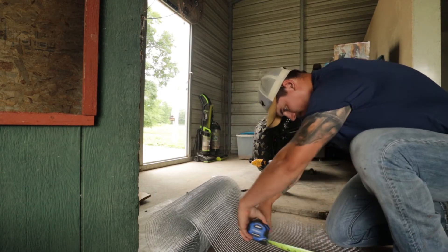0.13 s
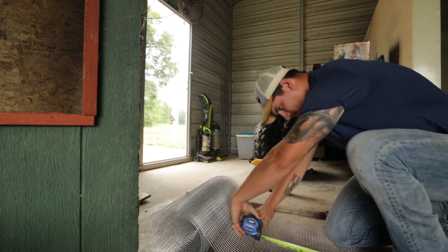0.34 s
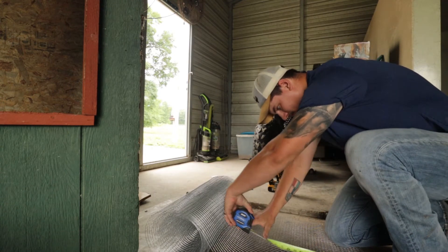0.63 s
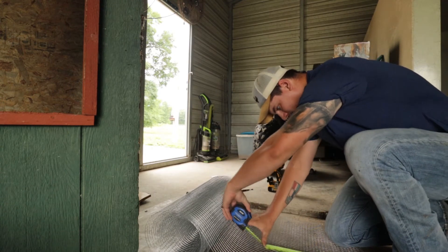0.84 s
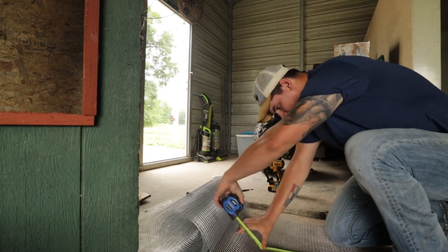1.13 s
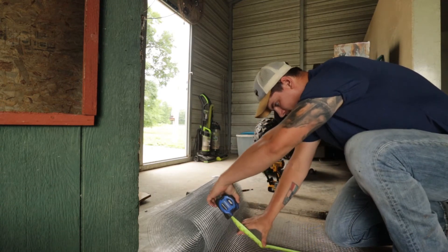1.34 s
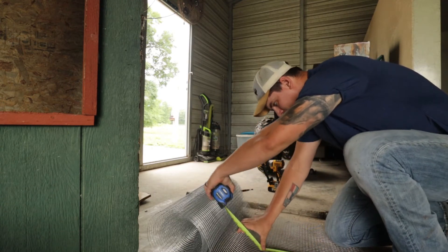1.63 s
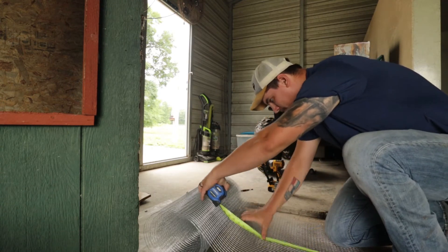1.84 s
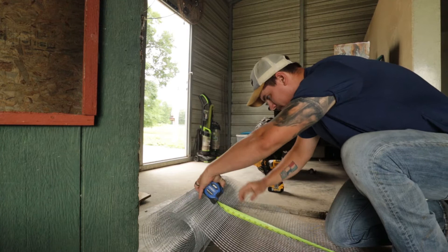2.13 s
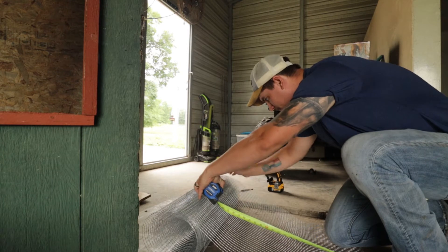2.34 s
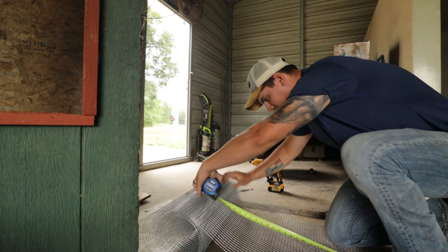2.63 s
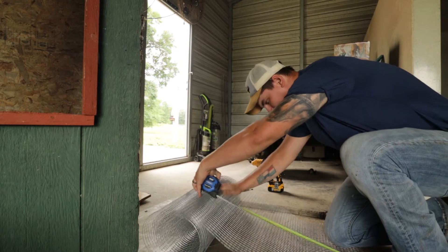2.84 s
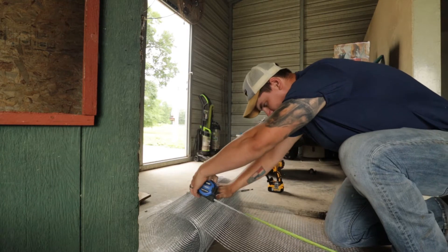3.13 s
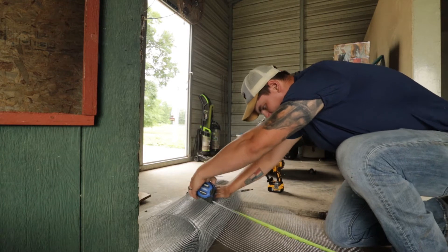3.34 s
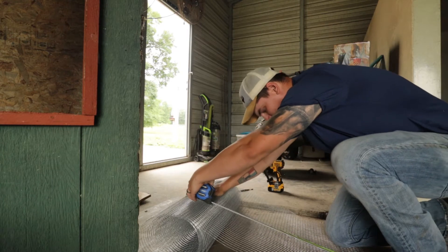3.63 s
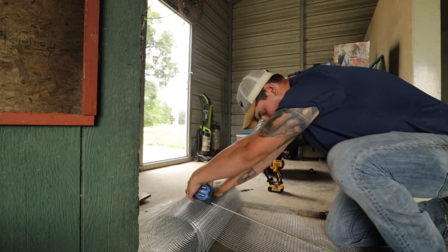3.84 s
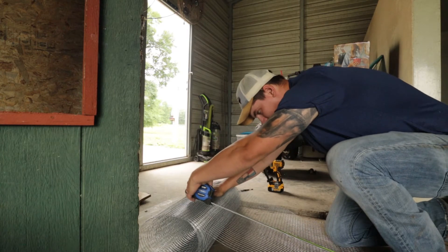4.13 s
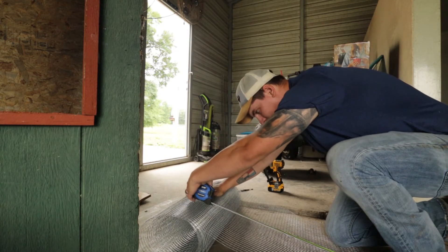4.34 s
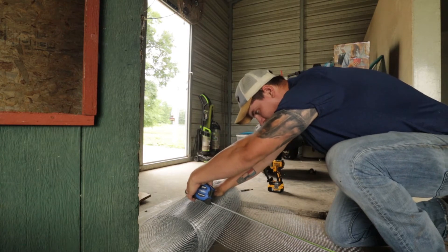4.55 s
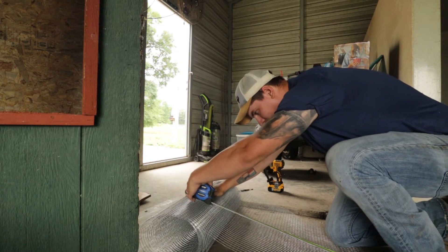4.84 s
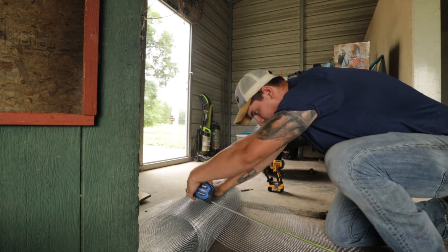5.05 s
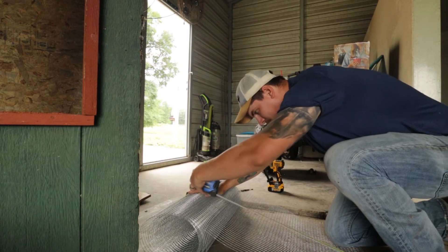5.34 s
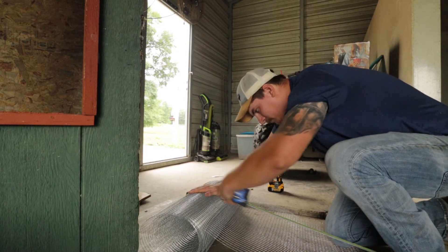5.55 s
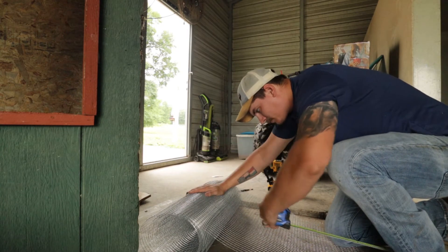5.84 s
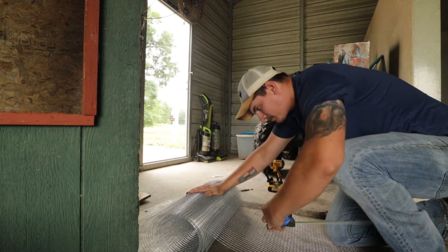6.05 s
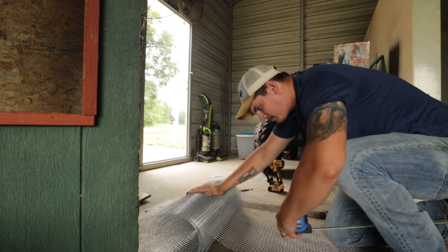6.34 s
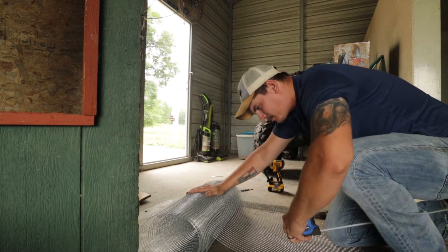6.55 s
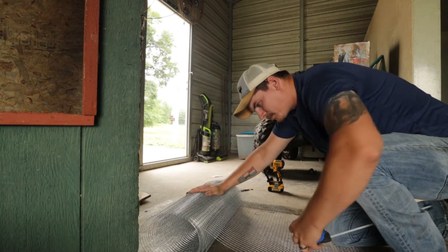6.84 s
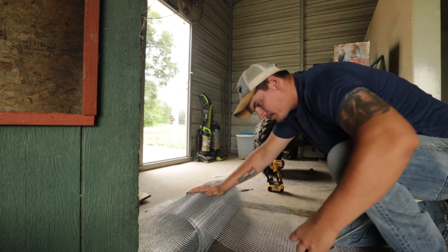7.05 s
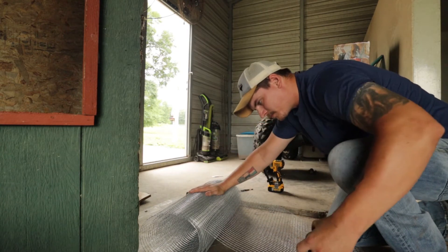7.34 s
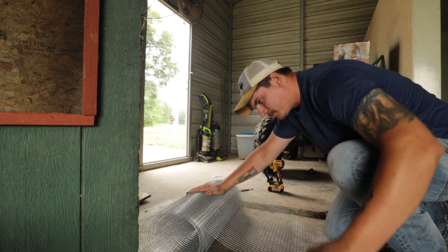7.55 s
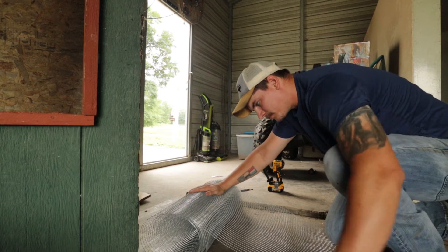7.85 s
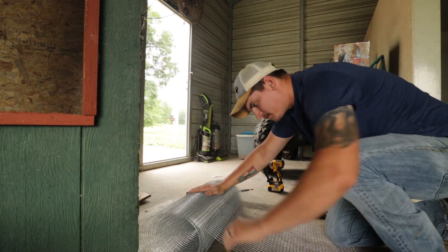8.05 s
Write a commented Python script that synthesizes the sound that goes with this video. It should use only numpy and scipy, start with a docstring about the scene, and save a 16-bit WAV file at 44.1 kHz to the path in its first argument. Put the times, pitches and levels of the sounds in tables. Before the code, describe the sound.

A steel tape slides and snaps over wire mesh in an echoing metal shed, with a low cooling hum, bird chirps and throbbing insects.

```python
"""Tape measure on wire mesh

A steel tape measure is drawn over a roll of welded wire mesh on the concrete floor of a sheet-metal shed.
Snaps are short noise rattles, sliding is many tiny ticks, and the set-down tape case knocks and rings.
A cooling unit hums in steady tones over noisy air; birds (gliding sines) and insects (throbbing noise)
come in through the open door. Handling and bird sounds also echo in the shed."""
import sys
import numpy as np
from scipy import signal
from scipy.fft import rfft, irfft, next_fast_len
from scipy.io import wavfile

SR = 44100
rng = np.random.default_rng(int(sys.argv[2]) if len(sys.argv) > 2 else 0)


def generate_wav(sig):
    """Save sig (samples, or channels by samples) to the path in sys.argv[1] as 16-bit PCM at SR."""
    pcm = np.round(np.clip(np.atleast_2d(sig).T, -1, 1) * 32767).astype(np.int16)
    wavfile.write(sys.argv[1], SR, pcm)


N = 361619
TIME = np.arange(N) / SR
HIT_SAMPLES = 4096   # longest rattle, about 93 ms

# Ringing tones of the steel blade: pitch_hz [Hz], level_db [dB], t60_s [s to fall 60 dB]
BLADE_RING = [(3934, 5, .2), (5230, 8, .3), (5250, -22, 0.28), (6480, -8, 0.23), (6150, -11, 0.21),
              (7700, -26, 0.18), (7770, -7.5, 0.132), (7980, -10.5, 0.19)]


def amp(db):
    """Turn decibels into a gain."""
    return 10 ** (np.asarray(db) / 20)


def rms_one(x):
    """Scale to an rms (average strength) of 1."""
    return x / np.sqrt(np.mean(x ** 2) + 1e-20)


def at_hz(points, hz):
    """Read a table between its points, with frequency spaced in octaves."""
    table_hz, values = np.transpose(points)
    return np.interp(np.log(hz), np.log(table_hz), values)


def colour(x, spectrum):
    """Filter x by a table of dB at each frequency, then scale to rms 1."""
    size = next_fast_len(len(x))
    hz = np.maximum(np.fft.rfftfreq(size, 1 / SR), 1)
    filtered = irfft(rfft(x, size) * amp(at_hz(spectrum, hz)), size)
    return rms_one(filtered[:len(x)])


def band(x, low_hz, high_hz):
    """Keep the sound between two frequencies."""
    sos = signal.butter(2, [low_hz, min(high_hz, 20000)], "band", fs=SR, output="sos")
    return signal.sosfilt(sos, x)


def resonance(x, hz, width_hz):
    """Favour one pitch, like a damped vibrating body; the gain is 1 at the top."""
    r = np.exp(-np.pi * width_hz / SR)
    top = np.array([1, 0, -1]) * (1 - r * r) / 2
    return signal.lfilter(top, [1, -2 * r * np.cos(2 * np.pi * hz / SR), r * r], x)


def ring(x, modes):
    """Let x strike several fading tones at once; a click of size 1 starts each at its level."""
    out = 0
    for hz, level_db, t60_s in modes:
        r = amp(-60 / (t60_s * SR))
        w = 2 * np.pi * hz / SR
        # the tiny offset keeps the filter out of very slow number ranges
        tone = signal.lfilter([0, np.sin(w)], [1, -2 * r * np.cos(w), r * r], x + 1e-18)
        out = out + amp(level_db) * tone
    return out


def drift(rate_hz):
    """Random wandering of spread 1; a higher rate wanders faster."""
    r = np.exp(-2 * np.pi * rate_hz / SR)
    noise = rng.standard_normal(N + SR)
    return rms_one(signal.lfilter([1], [1, -2 * r, r * r], noise)[SR:])   # skip the filter's start


def rattles(events, t60s):
    """Per event: a dying rattle of contacts, and one click of equal energy to set off the echo."""
    after = np.arange(HIT_SAMPLES) / SR
    noises = rng.standard_normal((len(events), HIT_SAMPLES))
    for (start_s, level_db, *_), t60_s, noise in zip(events, t60s, noises):
        attack = 1 - np.exp(-after / 0.00043)
        rattle = noise * amp(level_db - 60 * after / t60_s) * attack
        click = (after == 0) * np.sqrt(np.sum(rattle ** 2))
        first = round(start_s * SR)
        yield slice(first, first + HIT_SAMPLES), np.array([rattle, click])


def cooling_unit():
    """Blade, shaft and mains tones over rushing air, with faint whines of the casing."""
    # Tones at multiples of each base pitch: multiple [whole number], level_db [dB rms]
    fan_tones = {1: -60, 2: -62, 3: -72, 6: -70.5}
    shaft_tones = {2: -64.5, 4: -75, 5: -68, 6: -72.5, 7: -67.5, 9: -71.5, 10: -75, 22: -72.5, 34: -78.5}
    mains_tones = {2: -66.5, 4: -76.5}
    # Colour of the rushing air: pitch_hz [Hz], level_db [relative dB per Hz]
    air_colour = [(30, -22), (55, 3), (90, 2), (180, -1.5), (400, 0), (1000, -3.5), (2500, -11.5),
                  (4300, -14.5), (7200, -29), (10500, -35), (13000, -22.5), (16000, -22)]
    fan_hz, shaft_hz, mains_hz = 73.62, 59.085, 60.01
    in_step_s = 3.49   # all tones peak together here; shaft and mains hum then beat
    turn = 2 * np.pi * (TIME - in_step_s)
    tones = 0
    for hz, multiples in ((fan_hz, fan_tones), (shaft_hz, shaft_tones), (mains_hz, mains_tones)):
        for multiple, level_db in multiples.items():
            tones = tones + np.sqrt(2) * amp(level_db) * np.cos(multiple * hz * turn)
    air_noise, casing_noise = rng.standard_normal((2, N))
    whines = 0
    for hz, width_hz, level_db in ((4200, 370, -121.5), (4900, 40, -80), (6100, 478, -74.5)):
        whines = whines + amp(level_db) * rms_one(resonance(casing_noise, hz, width_hz))
    return tones + amp(-59.5) * colour(air_noise, air_colour) + whines


def insects():
    """A near singer, narrow noise at 9 kHz, swells about four times a second over a wider far chorus."""
    # Pace of the near singer: throb_number [count], time_s [s]
    throb_pace = [(0, .05), (3, .7), (5, 1.25), (11, 2.7), (17, 4.07), (21, 5.07), (34, 8.2)]
    level_db, spread_db, rise_s, fall_s = -61.5, 1, .03, .055
    number, time_s = np.transpose(throb_pace)
    throbs_s = np.interp(np.arange(number[-1] + 1), number, time_s)
    levels_db = level_db + spread_db * rng.standard_normal(len(throbs_s))
    swell = 0
    for throb_s, throb_db in zip(throbs_s, levels_db):
        width_s = np.where(TIME < throb_s, rise_s, fall_s)
        swell = swell + amp(throb_db) * np.exp(-((TIME - throb_s) / width_s) ** 2)
    near, chorus = rng.standard_normal((2, N))
    for _ in range(2):
        near = resonance(near, 9000, 450)
    for _ in range(3):
        chorus = resonance(chorus, 9000, 1600)
    # the near singer never falls quite silent, and its level flickers
    near = (swell + amp(-75)) * rms_one(near) * amp(2 * drift(87))
    return near + amp(-65) * rms_one(chorus)


def sliding():
    """Uneven clumps of ticks over the wires, each a few ms of noise; strokes swell, hold and fade."""
    # Colour of the ticks: pitch_hz [Hz], level_db [relative dB per Hz]
    slide_colour = [(410, -16), (700, 0.5), (830, 0), (1010, -10), (1230, -5.5), (4430, -1), (8760, -10.5),
                    (10800, -21.5), (14000, -19.5), (16000, -28)]
    # Strokes of mesh and blade: start_s [s], length_s [s], level_db [relative dB], brightness_db [dB]
    slide_strokes = [(-.05, .1, -49.5, 5), (.08, 0.242, -50, 4.5), (0.608, 0.37, -58, 5),
                     (0.975, .32, -57.5, 4), (5.404, 0.055, -50.5, 2), (5.562, 0.16, -47, 0),
                     (5.897, 0.11, -49, -6), (6.256, 0.15, -43.5, 4), (6.427, 0.13, -55, 0),
                     (6.677, 0.289, -54, 12), (6.999, 0.428, -54.5, 11), (7.438, 0.044, -48.5, 5)]
    attack_s, release_s, ticks_per_s = 0.059, 0.027, 7300   # tick rate drifts around this
    born = rng.random(N) < ticks_per_s * amp(2.5 * drift(40)) / SR
    sizes = born * amp(3.8 * np.minimum(rng.exponential(1, N), 5))
    fade = amp(-60 / (0.016 * SR))   # each tick falls 60 dB in 16 ms
    ticks = signal.lfilter([1], [1, -fade], sizes) * rng.standard_normal(N)
    ticks = colour(ticks, slide_colour)
    ticks = ticks + amp(-63) * ring(ticks, BLADE_RING)   # the blade sings faintly as it is dragged
    # the scrape shifts its colour from wire to wire
    for low_hz, high_hz in ((1500, 5000), (3500, 6500), (6000, 9700)):
        ticks = ticks + (amp(3.1 * drift(6.3)) - 1) * band(ticks, low_hz, high_hz)
    treble = signal.sosfilt(signal.butter(2, 6000, "high", fs=SR, output="sos"), ticks)
    out = 0
    for start_s, length_s, level_db, bright_db in slide_strokes:
        end_s = start_s + length_s
        corners_s = [start_s - attack_s, start_s, end_s, end_s + release_s]
        stroke = np.interp(TIME, corners_s, [0, 1, 1, 0]) ** 2
        out = out + amp(level_db) * stroke * (ticks + (amp(bright_db) - 1) * treble)
    return out


def blows():
    """Blade on mesh: a noisy crack with a brief pitch, body below, sheen above and a faint blade ring."""
    # Snaps and ticks: start_s [s], level_db [relative dB], centre_hz [Hz], t60_s [s to fall 60 dB]
    snaps = [(0.0767, -39, 6000, .025), (0.1222, -31, 5460, 0.023), (0.2764, -30, 2520, 0.052),
             (0.326, -37, 5960, .02), (0.81, -37, 5070, .022), (0.835, -34.5, 7800, .014),
             (0.9159, -40, 3730, .056), (0.976, -38.5, 8550, 0.027), (1.503, -42, 9000, .034),
             (1.5464, -24, 7400, 0.025), (1.5596, -15.5, 2500, .025), (1.704, -28.5, 2730, .048),
             (1.7148, -33, 2675, .03), (1.9932, 2.5, 6140, 0.078), (2.6835, -35, 2970, 0.065),
             (2.78, -46, 2910, 0.07), (2.9896, -42, 8880, 0.022), (3.1607, -38, 3490, 0.031),
             (3.1923, -39, 3584, .03), (3.726, -47.5, 3150, 0.023), (5.3835, -32, 5700, 0.05),
             (5.409, -34, 5260, 0.036), (5.4359, -35, 4460, 0.095), (5.543, -22, 7700, 0.057),
             (5.607, -34.5, 4430, 0.24), (5.631, -30.5, 6700, 0.19), (5.682, -32.5, 4500, 0.12),
             (5.8842, -32, 6100, 0.021), (5.901, -34.5, 5940, .032), (5.9353, -25.5, 4470, .019),
             (5.9748, -32, 4480, 0.024), (6.009, -36, 3000, 0.023), (6.2386, -20.5, 4140, 0.053),
             (6.2548, -15.5, 5260, 0.14), (6.2754, -12, 4300, 0.012), (6.32, -22.5, 5260, 0.029),
             (6.351, -26, 5250, .026), (6.39, -29.5, 5230, 0.03), (6.428, -27.5, 5460, 0.02),
             (6.5792, -36, 3290, 0.037), (6.766, -29, 4300, 0.015), (6.881, -33, 4370, 0.014),
             (7.0466, -32, 4500, .035), (7.089, -31, 3060, .027), (7.171, -34, 3130, 0.056),
             (7.2543, -32.5, 4900, .035), (7.317, -34, 4470, .04), (7.364, -30.5, 4740, .03),
             (7.4496, -24, 4900, 0.02), (7.4962, -19, 2990, 0.042), (7.4993, -16, 7700, 0.021),
             (7.8594, -11.5, 4630, 0.022), (8.0015, -1, 2400, .01), (8.006, 0.5, 2340, 0.031),
             (8.0214, -6.5, 2870, .02), (8.0771, -18.5, 3660, 0.04)]
    # Echo compared with the blow, less when the hands work near the microphone: time_s [s], level_db [dB]
    echo_levels = [(0, -3), (1.4, 1.5), (1.8, -4), (2, 1), (5.4, 3.5), (5.9, -1.1), (6.5, -4), (6.8, 9.5),
                   (7.4, 2.5), (7.45, -6), (7.85, 1), (8, -5.5), (8.2, 1)]
    crack, body, sheen = np.zeros((3, 2, N + HIT_SAMPLES))   # two rows each: direct, echo source
    for (at, hit), (start_s, level_db, hz, _) in zip(rattles(snaps, np.array(snaps)[:, 3]), snaps):
        echo_db = np.interp(start_s, *np.transpose(echo_levels))
        hit = hit * amp([[0], [echo_db]])
        pitch_db = -4.5 - .2 * (level_db + 31)   # lighter blows have a clearer pitch
        crack[:, at] += resonance(hit, hz, hz)
        crack[:, at] += amp(pitch_db) * resonance(hit, hz, 0.066 * hz)
        body[:, at] += hit * amp(-15)
        sheen[:, at] += hit * amp(-21)
    crack = band(crack, 1216, 9500)
    body = band(body, 1150, 2400)
    sheen = band(sheen, 9500, 17000)
    return (crack + amp(-58.5) * ring(crack, BLADE_RING) + body - sheen)[:, :N]


def knocks():
    """Tape case, hand and roll: one push rings a hollow tone with a dull scuff; the case rings on a little."""
    # Knocks: start_s [s], level_db [relative dB], hollow_hz [Hz], t60_s [s to fall 60 dB],
    # case_ring_db [relative dB]
    thuds = [(0.276, -46.5, 640, 0.035, -9), (0.83, -36, 560, 0.039, -33), (1.504, -44.5, 597, 0.069, -22),
             (1.534, -40.5, 536, 0.11, -32), (1.562, -38.5, 560, 0.054, -12),
             (1.597, -45.5, 576, 0.067, -21), (1.993, -32, 910, 0.084, -25), (2.773, -46, 782, .057, -19.5),
             (5.542, -43, 453, .036, -14), (6.053, -44.5, 910, 0.046, -25), (6.072, -42.5, 507, .05, -32),
             (6.089, -46.5, 696, 0.067, -26), (6.238, -42, 527, 0.06, -30), (6.279, -42, 557, 0.047, -29.5),
             (7.497, -36, 663, 0.069, -12), (7.511, -34, 637, 0.03, -30), (7.537, -44, 682, 0.084, -26.5),
             (7.862, -28.5, 500, .037, -40), (7.872, -28, 586, 0.053, -40), (8.007, -10, 587, 0.023, -5),
             (8.022, -21, 483, 0.024, -28), (8.076, -16, 850, 0.011, -23), (8.094, -41, 754, .04, -4)]
    # Ringing tones of the tape case: pitch_hz [Hz], level_db [dB], t60_s [s to fall 60 dB]
    case_ring = [(1637, 3.5, .012), (1912, 8, 0.11), (1825, -12, 0.11), (1920, -2, 0.05),
                 (2420, -0.5, 0.013)]
    hollow, scuff, case = np.zeros((3, 2, N + HIT_SAMPLES))   # two rows each: direct, echo source
    push = np.arange(HIT_SAMPLES) == 0
    for (at, hit), (_, level_db, hz, t60_s, ring_db) in zip(rattles(thuds, np.array(thuds)[:, 3]), thuds):
        hollow[:, at] += ring(push, [(hz, level_db, t60_s)])
        scuff[:, at] += hit
        case[:, at] += hit * amp(ring_db)
    hollow = band(hollow, 330, 1900)
    scuff = amp(7.5) * band(scuff, 290, 1400)
    case = amp(-23.5) * ring(band(case, 1400, 2550), case_ring)
    return (hollow + scuff + case)[:, :N]


def birds():
    """Sine glides and held notes, broken up by moving air, and what of them reaches the walls."""
    # Quick chirps: start_s [s], length_s [s], from_hz [Hz], to_hz [Hz], level_db [relative dB]
    quick_chirps = [(0.364, 0.066, 2790, 1830, -53), (0.449, 0.07, 3090, 1584, -54.5),
                    (0.921, 0.093, 2850, 2074, -57), (1.004, .095, 3397, 1780, -53),
                    (1.613, 0.031, 2740, 2050, -60), (1.67, .032, 2053, 1556, -51),
                    (1.703, .03, 3000, 1950, -45), (2.197, .044, 2600, 1980, -67),
                    (2.278, 0.072, 2950, 1670, -53.5), (2.684, 0.085, 3100, 1882, -48.5),
                    (2.784, .068, 3200, 1910, -48.5), (3.874, 0.021, 3380, 1960, -53.5),
                    (4.517, .021, 3400, 2043, -54.5), (4.552, 0.037, 3790, 3080, -64.5),
                    (4.612, 0.047, 3350, 2960, -69), (4.774, 0.012, 5820, 7700, -59),
                    (4.784, 0.042, 7750, 7160, -69.5), (5.142, 0.0578, 3100, 2775, -73)]
    # A far bird's notes, each sliding to its pitch: start_s [s], length_s [s], from_hz [Hz],
    # held_hz [Hz], level_db [relative dB]
    held_notes = [(3.855, .025, 3380, 3290, -61), (3.898, .112, 1883, 2190, -59),
                  (4.029, 0.11, 2150, 2167, -57.5), (4.144, .07, 2164, 2160, -68),
                  (4.065, 0.17, 3480, 3550, -73), (4.472, 0.047, 2900, 2930, -64),
                  (4.543, 0.085, 1550, 2117, -55.5), (4.646, 0.123, 2174, 2160, -53.5),
                  (4.792, 0.084, 2120, 2117, -68), (5.055, 0.07, 3315, 3294, -61.5),
                  (5.138, .14, 3300, 3260, -72), (5.203, .08, 2830, 2750, -71)]
    scoop_s, attack_s, release_s = .018, .004, 0.012
    chirps, echoed, whistles = 0, 0, 0
    for start_s, length_s, from_hz, to_hz, level_db in quick_chirps:
        part = np.clip((TIME - start_s) / length_s, 0, 1)
        pitch_hz = from_hz * (to_hz / from_hz) ** part
        chirp = amp(level_db) * np.sin(2 * np.pi * np.cumsum(pitch_hz) / SR)
        chirps = chirps + chirp * np.sin(np.pi * part) ** .8
        echo_db = -2.5 - .45 * (level_db + 50.5)   # fainter chirps have more echo for their level
        echoed = echoed + amp(echo_db) * chirp * np.sin(np.pi * part) ** 0.15
    for start_s, length_s, from_hz, held_hz, level_db in held_notes:
        since_s, left_s = TIME - start_s, start_s + length_s - TIME
        pitch_hz = held_hz + (from_hz - held_hz) * np.exp(-np.maximum(since_s, 0) / scoop_s)
        shape = np.clip(np.minimum(since_s / attack_s, left_s / release_s), 0, 1)
        whistles = whistles + amp(level_db) * shape * np.sin(2 * np.pi * np.cumsum(pitch_hz) / SR)
    flutter = amp(4 * drift(40))
    whistles = flutter * whistles
    return np.sqrt(flutter) * chirps + whistles, echoed + amp(-9.5) * whistles


def pings():
    """Two light ticks ping briefly at one pitch, each a sine that dies away."""
    # Light ticks: start_s [s], level_db [dB]
    ping_ticks = [(3.1607, -47), (3.1923, -44)]
    ping_hz, t60_s = 3600, 0.033
    start_s, level_db = np.transpose(ping_ticks)
    clicks = np.zeros(N)
    clicks[(start_s * SR).astype(int)] = amp(level_db)
    return ring(clicks, [(ping_hz, 0, t60_s)])


def shed(x):
    """Dense echoes off sheet walls and concrete: noise that swells in quickly and dies band by band."""
    # How long the echo lasts: pitch_hz [Hz], t60_s [s to fall 60 dB]
    echo_times = [(200, 0.32), (1000, 0.57), (2500, 0.8), (5000, 0.68), (8000, 0.67), (11000, 0.48),
                  (16000, 0.36)]
    swell_s = 0.0016
    after = np.arange(SR) / SR
    edges_hz = 150 * 2 ** np.arange(0, 7.1, .5)   # half-octave bands
    echo = 0
    for low_hz, high_hz in zip(edges_hz, edges_hz[1:]):
        t60_s = at_hz(echo_times, np.sqrt(low_hz * high_hz))
        echo = echo + band(rng.standard_normal(SR), low_hz, high_hz) * amp(-60 * after / t60_s)
    echo = echo * (1 - np.exp(-after / swell_s))
    return signal.fftconvolve(x, echo / np.sqrt(np.sum(echo ** 2)))[:N]


def scene():
    """Add the direct sounds, their echoes in the shed, the insects and the cooling unit."""
    slid = sliding()
    struck, struck_click = blows()
    knocked, knocked_click = knocks()
    calls, calls_echoed = birds()
    to_walls = amp(-4.5) * struck_click + amp(-9.5) * knocked_click + amp(-11.5) * slid + calls_echoed
    direct = struck + knocked + amp(-2) * slid + calls + pings()
    return (direct + shed(to_walls) + insects() + cooling_unit())[None]


def record(dry):
    """Gain control ducks after loud blows and creeps back, peaks are rounded, the top is cut."""
    over_db = np.maximum(20 * np.log10(np.abs(dry[0]) + 1e-9) + 10, 0)   # excess above -10 dB
    release = 9 * TIME   # the held excess falls 9 dB each second
    held_db = np.maximum.accumulate(over_db + release) - release
    smooth_db = signal.lfilter([.002], [1, -.998], np.maximum(held_db, 0))
    ducked = dry * amp(-.25 * smooth_db)   # turn down by a quarter of the excess
    rounded = .72 * np.tanh(ducked / .72)
    top_cut = signal.cheby2(18, 80, 16100, fs=SR, output="sos")   # 80 dB down from 16100 Hz up
    return signal.sosfilt(top_cut, rounded)


dry = scene()
out = record(dry)
generate_wav(out)
```